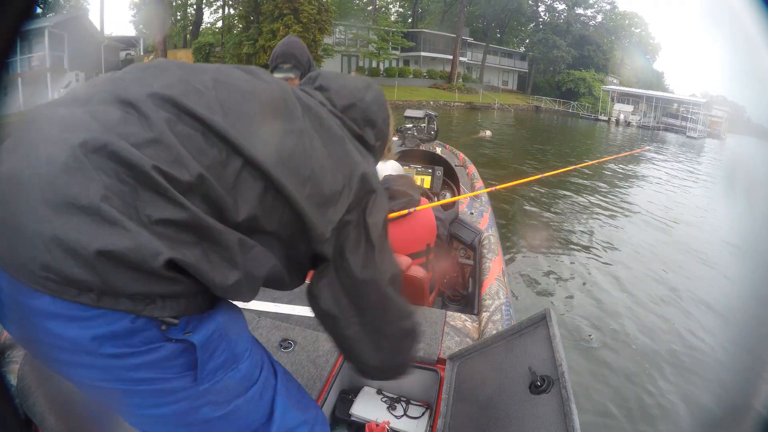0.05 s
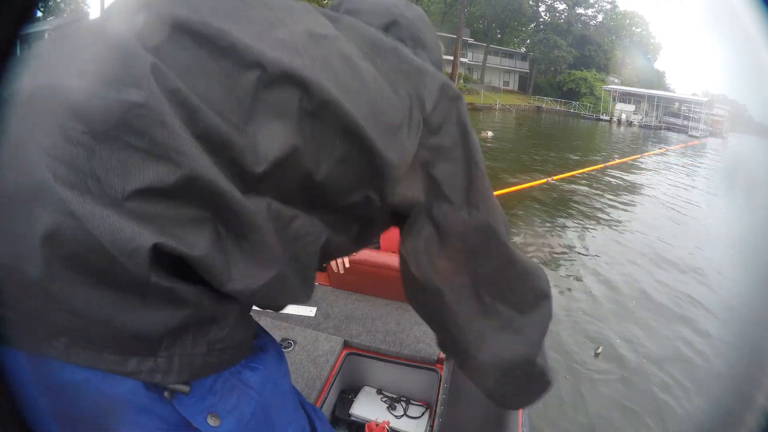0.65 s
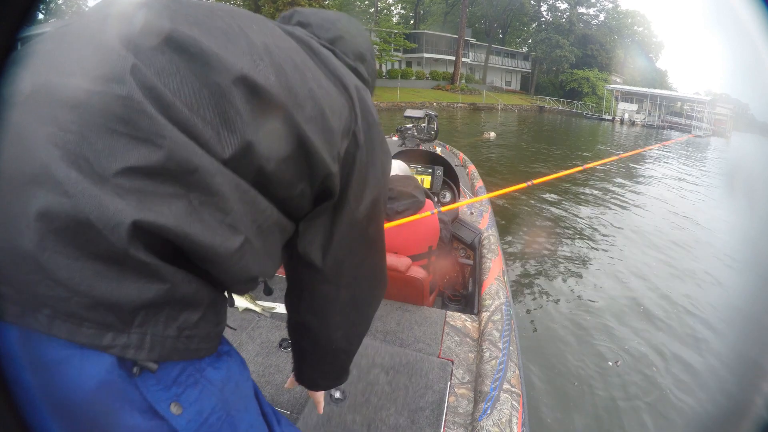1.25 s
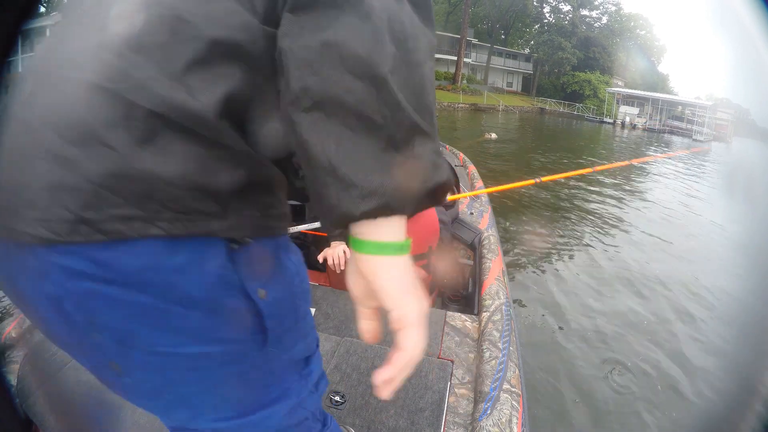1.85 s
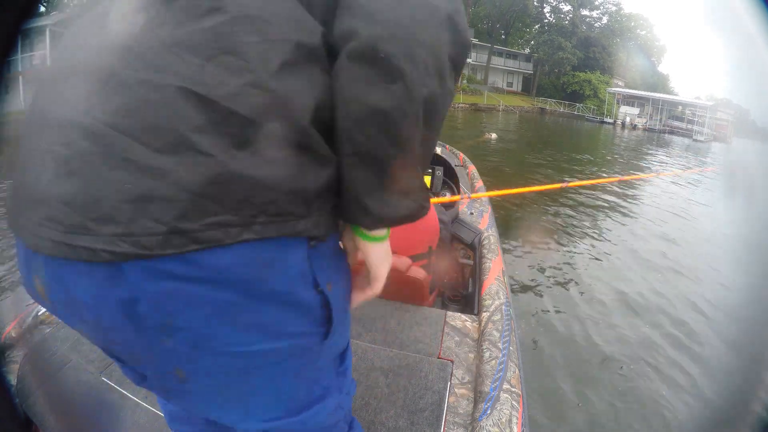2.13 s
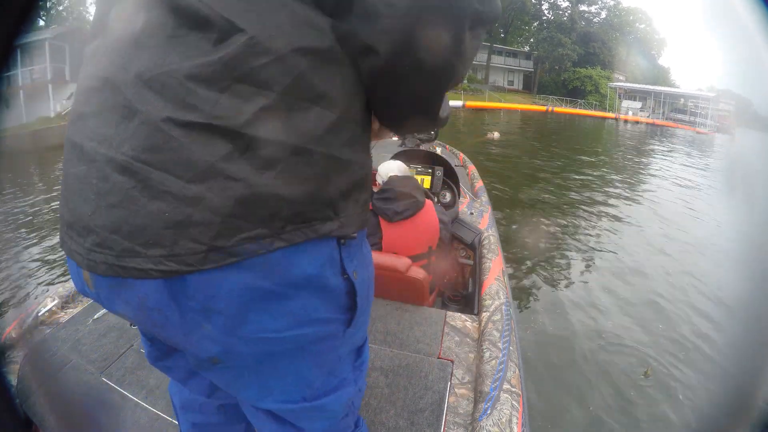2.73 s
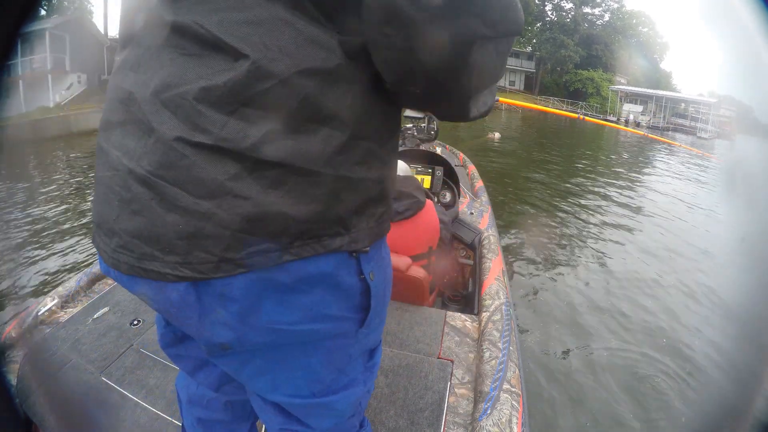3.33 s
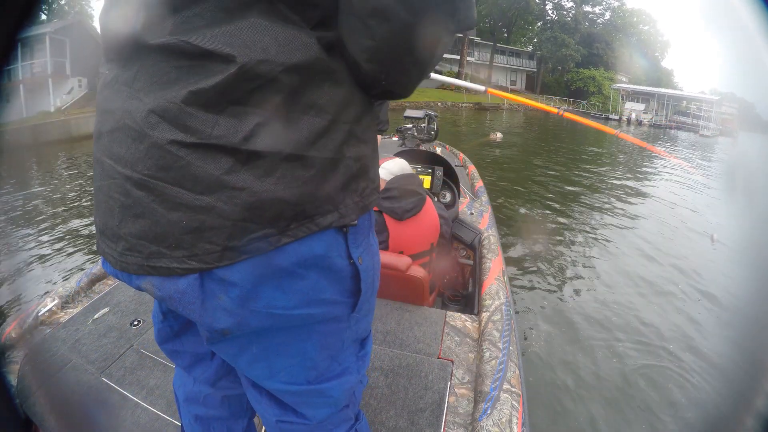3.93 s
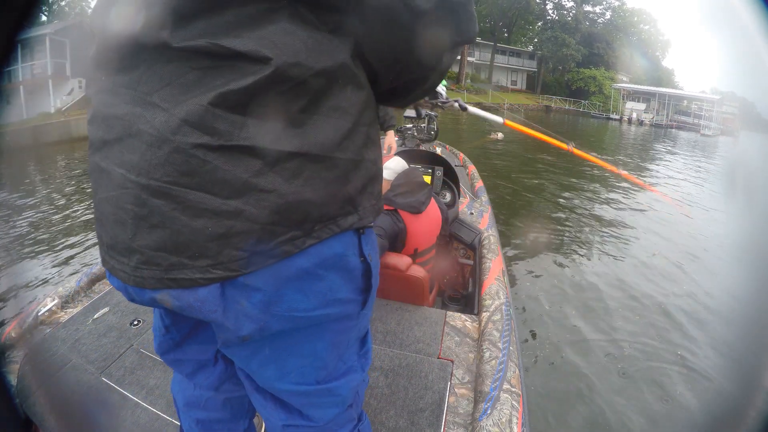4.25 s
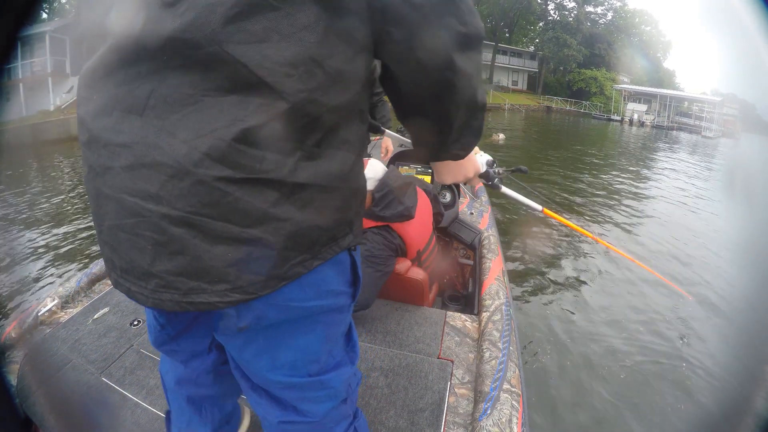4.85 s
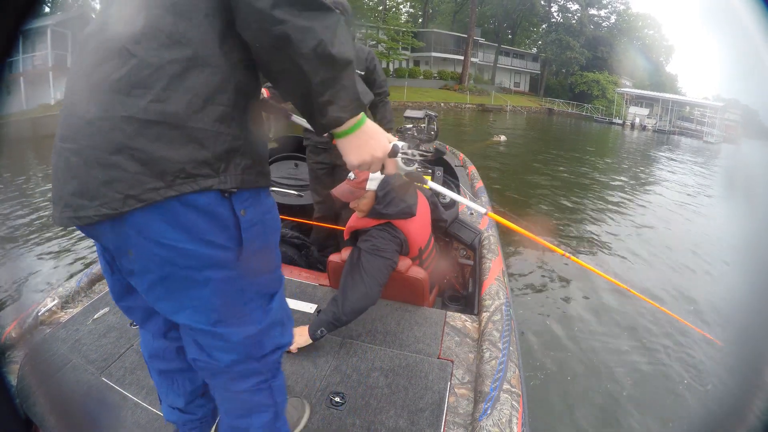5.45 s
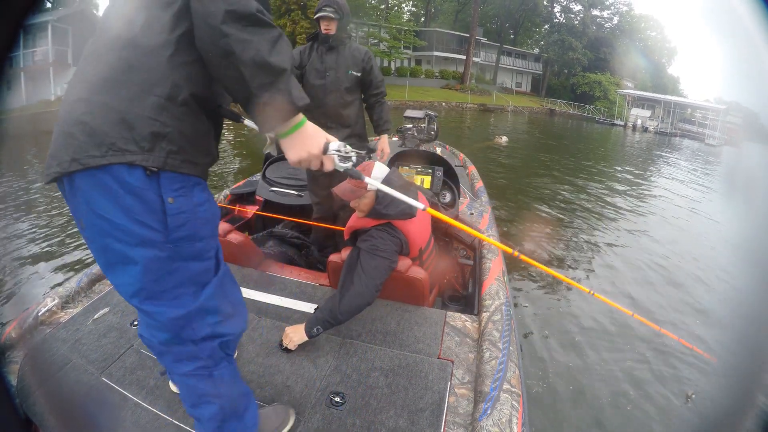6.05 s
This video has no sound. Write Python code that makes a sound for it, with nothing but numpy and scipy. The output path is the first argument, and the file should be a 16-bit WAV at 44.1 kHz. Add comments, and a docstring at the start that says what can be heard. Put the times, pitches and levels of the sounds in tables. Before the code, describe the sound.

Muffled thumps and knocks on a fiberglass boat deck as a hatch shuts, over a steady low electric motor hum.

```python
"""Angler on a fiberglass deck

On board a fishing boat, the microphone sits inside a sealed camera and hears mostly through the hull.
An angler shuts a hatch and steps about, each blow ringing the deck with a muffled thump. His tackle
clicks and his rain gear rubs. Behind him water nudges the hull, an electric motor hums steadily,
and the camera's own electronics hiss."""
import sys
import numpy as np
from scipy import signal
from scipy.fft import rfft, irfft, next_fast_len
from scipy.io import wavfile
from scipy.ndimage import map_coordinates

SR = 44100
rng = np.random.default_rng(int(sys.argv[2]) if len(sys.argv) > 2 else 0)


def log_audio(samples):
    """Write samples as a 16-bit WAV file to the path given in sys.argv[1]."""
    # one column per channel
    frames = np.atleast_2d(samples).T
    # limit to full scale, then quantise
    limited = np.clip(frames, -1, 1)
    pcm = np.round(limited * 32767).astype(np.int16)
    wavfile.write(sys.argv[1], SR, pcm)


N = 268567

# whine of the camera's electronics: centre_hz, rms_db, half_width_hz
WHINE_BANDS = [(7352, -91.5, 22), (14698, -90.5, 28)]
# hiss of the camera's electronics: frequency_hz, relative_db
HISS_SPECTRUM = [(300, 2), (1500, 1), (3000, 0), (5000, -2.5), (7500, -7), (10000, -10), (13000, -11.5),
                 (15000, -15)]
# motor hum, heard through the hull: pitch_hz, rms_db, wander_hz
HUM_LINES = [(196.5, -71.5, 3.44), (282.6, -57.5, 1.16), (353.7, -73, 3.2), (391, -70, 1.27),
             (478, -80.5, .6), (703, -80.5, 0.91), (783, -78.5, .5), (1027, -83, 0.97)]
# the motor's dull wash: frequency_hz, relative_db
WASH_SPECTRUM = [(100, -18.5), (165, -25), (200, 0.5), (240, -5), (290, 2.5), (350, -4), (440, -20.5),
                 (540, -13.5), (640, -27.5), (760, -23.5), (900, -33), (1100, -38), (1250, -39.5),
                 (1400, -33.5), (1600, -44.5), (4000, -52.5)]
# deep rumble of the water: frequency_hz, relative_db
RUMBLE_SPECTRUM = [(12, -4), (25, -5), (33, 4.5), (41, 5), (52, -5.5), (90, -17.5), (200, -49)]
# boom of the hull: frequency_hz, relative_db
BOOM_SPECTRUM = [(45, -23.5), (60, -14.5), (67, -2), (73, -1.5), (80, -16), (100, -15.5), (200, -68)]
# the deck stirring underfoot: frequency_hz, relative_db
TREAD_SPECTRUM = [(50, -23), (90, -1.5), (110, -0.5), (130, -3), (165, -8.5), (195, -2.5), (240, -13),
                  (400, -19), (900, -72)]
# the angler shifts his weight: middle_s, length_s, level_db
WEIGHT_SHIFTS = [(0.01, 0.12, -54), (.92, 0.74, -54.5), (2.77, 0.13, -56), (3.27, 0.33, -57),
                 (4.19, 0.24, -56), (4.66, 0.53, -52.5), (5.3, 0.19, -56.5), (5.6, 0.11, -57.5)]
# drips beside the hull: start_s, level_db, pitch_hz, length_s
WATER_DRIPS = [(2.232, -62, 673, 0.048), (3.942, -56, 1125, 0.018), (3.988, -55, 1020, .008)]
# rubbing rain gear: frequency_hz, relative_db
CLOTH_SPECTRUM = [(300, -10.5), (750, -7), (900, -3.5), (1120, 7), (1350, -15.5), (3000, -23),
                  (9000, -57.5)]
# strokes of the sleeves: middle_s, length_s, level_db
SLEEVE_STROKES = [(.55, 0.78, -79.5), (.76, 0.027, -67), (.89, 0.099, -71), (1.54, 0.61, -76.5),
                  (5.32, 0.2, -79)]
# modes of the camera case around the microphone: pitch_hz, relative_db
CASE_MODES = [(960, -61), (1070, 1), (1170, 0.5), (1370, -1), (2050, -2.5), (3520, 4)]
# clicks of rod, reel and latch: start_s, level_db, pitch_hz, relative_snap_db, t60_s
TACKLE_CLICKS = [(0.7985, -47.5, 1060, -40, 0.038), (1.562, -58, 1120, -25, 0.053),
                 (1.641, -56, 1090, -25, 0.03), (3.9053, -40, 1280, -6, 0.012),
                 (4.0732, -45.5, 1650, -14, 0.018), (4.389, -42, 1280, -21, 0.015),
                 (4.7908, -40, 1110, 1.5, 0.014), (4.7923, -41.5, 2400, 1, 0.014)]
# modes of deck and hull: pitch_hz, relative_db, t60_s
DECK_MODES = [(39.8, 3.5, 0.6), (73.3, 4.5, 0.49), (85.3, 0, 0.23), (98, -12, 0.39), (130.8, -14.5, 0.25),
              (197.6, -12, 0.21), (219.6, -9, 0.069), (248, -9.5, 0.066), (281.5, -11.5, 0.15),
              (325.5, -9.5, 0.095), (396, -12.5, 0.11), (445, -22, 0.059), (560, -9, 0.02), (770, -25, 0.1),
              (920, -36.5, 0.12), (1053, -11.5, 0.075), (1103, -11.5, 0.082), (1540, -11, 0.035),
              (1820, -11, 0.035), (2480, -14, 0.035), (3150, -14, 0.03)]
# light knocks on the deck, each at the pitch of its struck spot: start_s, level_db, spot_hz
DECK_KNOCKS = [(0.7636, -17.5, 320), (0.7965, -12.5, 328), (2.72, -31, 282), (3.007, -22.5, 307),
               (3.168, -40, 71.5), (3.317, -26, 198), (4.095, -27.5, 196), (4.371, -23, 400),
               (4.654, -24, 198), (4.751, -41, 72), (5.268, -19.5, 227), (5.605, -32.5, 210),
               (5.946, -28, 204)]
# footsteps, heel then sole: start_s, heel_db, spot_hz, focus_db_per_octave, roll_s, sole_db
FOOTSTEPS = [(0.3815, -24, 224, 9.5, .0145, -30), (0.971, -18, 321, 47, .043, -35),
             (5.788, -16, 126, 32.5, .014, -50)]
# the hatch lid on its frame: start_s, level_db, spot_hz, bright_hz, focus_db_per_octave
HATCH_CONTACTS = [(1.2858, -16.5, 415, 930, 15), (1.2911, -4.5, 222, 1810, 11.5),
                  (1.2945, -10, 129, 2200, 9), (1.3019, -11.5, 102.7, 170, 5), (1.3104, -11.5, 780, 420, 5),
                  (1.3278, -13.5, 363, 370, 6.5), (1.8566, -25, 63, 1500, 5), (1.8645, -21, 240, 584, 5),
                  (1.891, -13.5, 157, 300, 19.5), (1.9004, -16, 60.8, 80.4, 37.5)]

WASH_DB, WASH_FADE_DB_PER_S, WASH_ROCK_DB = -54, 0.36, -3  # WASH_DB is the level halfway through
TREAD_REST_DB, BOOM_REST_DB, RUMBLE_DB, CLOTH_REST_DB = -63, -61, -59, -82  # while he stands still
BOOM_LAG_S, BOOM_GAIN_DB = 0.036, 3.5  # the hull's answer, relative to a shift of weight
RATTLE_BAND_HZ, RATTLE_DB, RATTLE_T60_S = (1000, 3600), -23.5, 0.034  # loose fittings
SHOE_CONTACT_S = 0.0028  # a rubber shoe builds up its force over this time


def amp(db):
    """Decibels to gain."""
    return 10 ** (np.asarray(db) / 20)


def unit(x):
    """Scale to rms 1."""
    return x / np.sqrt(np.mean(x ** 2) + 1e-20)


def wobble(rate):
    """A smooth random curve, rate knots a second."""
    knots = rng.standard_normal(int(N * rate / SR) + 4)
    return map_coordinates(knots, [np.arange(N) * rate / SR])


def swells(rows, lag_s=0):
    """Gain per sample of smooth swells from rows of middle_s, length_s, level_db."""
    t = np.arange(N) / SR - lag_s
    return sum(amp(db) * np.exp(-(2 * (t - middle_s) / length_s) ** 2) for middle_s, length_s, db in rows)


def filtered(x, response):
    """Filter x with a gain given as a function of frequency."""
    size = next_fast_len(N + SR // 2)
    return irfft(rfft(x, size) * response(np.fft.rfftfreq(size, 1 / SR)), size)[:N]


def noise(spectrum):
    """Noise of rms 1 coloured by rows of frequency_hz, relative_db."""
    hz, db = np.transpose(spectrum)
    white = rng.standard_normal(N)
    return unit(filtered(white, lambda f: amp(np.interp(np.log(f + 1), np.log(hz + 1), db))))


def tones(lines, waver_db):
    """Steady lines that waver a little in pitch and strength."""
    out = np.zeros(N)
    for hz, db, wander_hz in lines:
        peak = amp(db + waver_db * wobble(9.5)) * np.sqrt(2)
        pitch_hz = hz + wander_hz * wobble(25.02)
        out += peak * np.sin(2 * np.pi * np.cumsum(pitch_hz) / SR)
    return out


def soften(x, corner_hz):
    """A soft contact spreads the force in time and loses the treble."""
    return signal.sosfilt(signal.butter(2, min(corner_hz, SR / 3), fs=SR, output="sos"), x)


def add(track, start_s, sound):
    """Mix a sound into the track at start_s."""
    part = track[round(start_s * SR):][:len(sound)]
    part += sound[:len(part)]


def electronics():
    """The camera's own noise floor: broad hiss and narrow bands of fuzzy whine."""
    whine = np.zeros(N)
    for hz, db, half_width_hz in WHINE_BANDS:
        band = filtered(rng.standard_normal(N), lambda f: 1 / (1 + ((f - hz) / half_width_hz) ** 2))
        whine += amp(db) * unit(band)
    return amp(-71.5) * noise(HISS_SPECTRUM) + whine


def motor():
    """An electric motor hums through the hull over a dull wash that swells as the boat rocks."""
    t = np.arange(N) / SR
    top_db = np.interp(t, [0.52, 0.77], [-79, -88])  # the top line sings, then fades back
    top_line = amp(top_db) * tones([(1174.0, 0.013, 0.53)], waver_db=1.3)
    easing = amp(WASH_DB - WASH_FADE_DB_PER_S * (t - t.mean()))
    rocking = amp(WASH_ROCK_DB) * swells(WEIGHT_SHIFTS)
    unsteady_db = 1.7 * wobble(2.64) + 0.23 * wobble(13)  # slow drift, quick flutter
    wash = np.hypot(easing, rocking) * amp(unsteady_db) * noise(WASH_SPECTRUM)
    return tones(HUM_LINES, waver_db=0.2) + top_line + wash


def hull():
    """Lapping water booms the hull over a deep rumble; a shift of weight stirs deck, then hull."""
    tread_gain = np.hypot(amp(TREAD_REST_DB), swells(WEIGHT_SHIFTS))
    tread = tread_gain * amp(0.74 * wobble(15)) * noise(TREAD_SPECTRUM)
    boom_gain = np.hypot(amp(BOOM_REST_DB), amp(BOOM_GAIN_DB) * swells(WEIGHT_SHIFTS, BOOM_LAG_S))
    boom = boom_gain * amp(1.2 * wobble(9.2)) * noise(BOOM_SPECTRUM)
    rumble = amp(RUMBLE_DB + 1.2 * wobble(2.6)) * noise(RUMBLE_SPECTRUM)
    return tread + boom + rumble


def drips():
    """Just beside the hull, each drop traps a bubble whose pitch rises as it rings out."""
    out = np.zeros(N)
    for start_s, db, hz, length_s in WATER_DRIPS:
        age = np.linspace(0, 1, round(length_s * SR))
        phase = 2 * np.pi * np.cumsum(hz * (1 + 0.041 * age)) / SR
        add(out, start_s, amp(db) * np.sin(np.pi * age) * np.sin(phase))
    return out


def rain_gear():
    """Sleeves rub in uneven little strokes, faint at the microphone."""
    rubbing = np.hypot(amp(CLOTH_REST_DB), swells(SLEEVE_STROKES))
    return rubbing * amp(1.6 * wobble(30)) * noise(CLOTH_SPECTRUM)


def tackle():
    """Hard little contacts snap and ring the camera case in the modes near their own pitch."""
    out, t = np.zeros(N), np.arange(SR // 8) / SR
    for start_s, db, pitch_hz, snap_db, t60_s in TACKLE_CLICKS:
        modes = sum(amp(mode_db - 18.6 * abs(np.log2(hz / pitch_hz))) * np.sin(2 * np.pi * hz * t)
                    for hz, mode_db in CASE_MODES)
        ring = modes * amp(-60 * t / t60_s) * (1 - np.exp(-t / 0.0018))
        snap = amp(snap_db - 6.0 - 60 * t / 0.0031) * rng.standard_normal(len(t))
        add(out, start_s, amp(db) * (ring + soften(snap, 11000)))
    return out


def deck_blow(db, spot_hz, bright_hz, focus_db, ring_share, contact_s=0):
    """A blow rings the deck modes near the struck spot's pitch and rattles loose fittings."""
    t = np.arange(SR) / SR
    hz, mode_db, t60_s = np.transpose(DECK_MODES)[:, :, None]
    rise = 1 - np.exp(-(t / (.5 / hz + contact_s)) ** 2)  # about one cycle plus the contact time
    swing = rise * np.sin(2 * np.pi * hz * t)
    octaves_away = abs(np.log2(hz / spot_hz))
    strength = amp(mode_db - focus_db * octaves_away + rng.normal(0, 0.063, hz.shape))
    softness = 1 / np.sqrt(1 + (hz / bright_hz) ** 4)
    decay = np.exp(-np.log(1000) * t / (t60_s * ring_share))  # a load on the deck shortens the ring
    ring = np.sum(strength * softness * swing * decay, axis=0)
    chatter = amp(RATTLE_DB - focus_db - 60 * t / RATTLE_T60_S) * rng.standard_normal(len(t))
    rattle = signal.sosfilt(signal.butter(2, RATTLE_BAND_HZ, "band", fs=SR, output="sos"), chatter)
    return amp(db) * (ring + soften(rattle, bright_hz))


def brightness_hz(db):
    """A harder blow is shorter and so brighter: 487 Hz at -20 dB, an octave up per 18 dB."""
    return 487 * 2 ** ((db + 20) / 18)


def knocks():
    """Feet and gear bump the deck lightly."""
    out = np.zeros(N)
    for start_s, db, spot_hz in DECK_KNOCKS:
        bump = deck_blow(db, spot_hz, brightness_hz(db), focus_db=30.5, ring_share=0.54,
                         contact_s=SHOE_CONTACT_S)
        add(out, start_s, bump)
    return out


def footsteps():
    """The heel knocks, then the weight rolls onto the soft sole, which drives and damps the low modes."""
    out = np.zeros(N)
    for start_s, heel_db, spot_hz, focus_db, roll_s, sole_db in FOOTSTEPS:
        heel = deck_blow(heel_db, spot_hz, brightness_hz(heel_db), focus_db, ring_share=0.99,
                         contact_s=SHOE_CONTACT_S)
        sole = deck_blow(sole_db, spot_hz=75, bright_hz=116, focus_db=9, ring_share=0.31)
        add(out, start_s, heel)
        add(out, start_s + roll_s, sole)
    return out


def hatch():
    """The lid slams and rebounds, then is trodden home: two quick runs of contacts with its frame."""
    out = np.zeros(N)
    for start_s, db, spot_hz, bright_hz, focus_db in HATCH_CONTACTS:
        add(out, start_s, deck_blow(db, spot_hz, bright_hz, focus_db, ring_share=0.93))
    return out


def scene():
    """Everything that reaches the one microphone on board."""
    angler = hatch() + footsteps() + knocks() + tackle() + rain_gear()
    background = drips() + hull() + motor()
    return (angler + background)[None]


def record(dry):
    """The camera drops the deepest bass, adds its own noise and cuts the top of the treble."""
    sound = signal.sosfilt(signal.butter(2, 22.5, "high", fs=SR, output="sos"), dry[0])
    return filtered(sound + electronics(), lambda hz: hz < 15200)[None]


dry = scene()
out = record(dry)
log_audio(out)
```